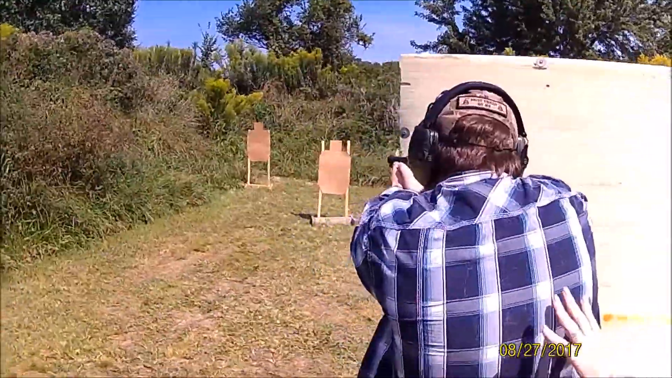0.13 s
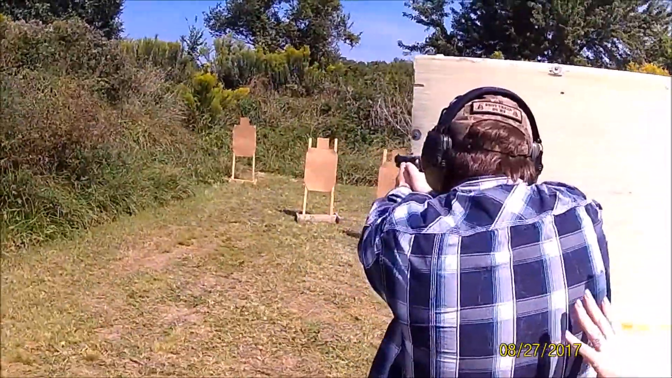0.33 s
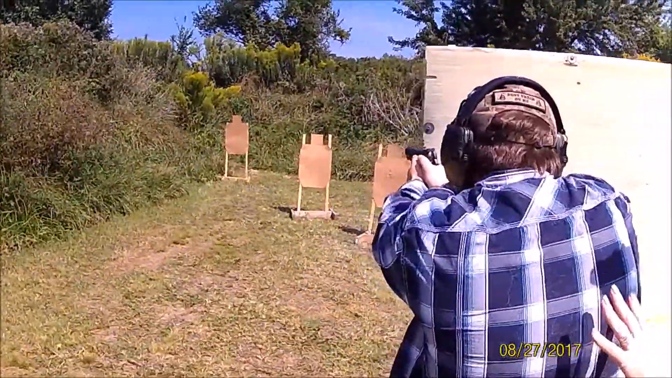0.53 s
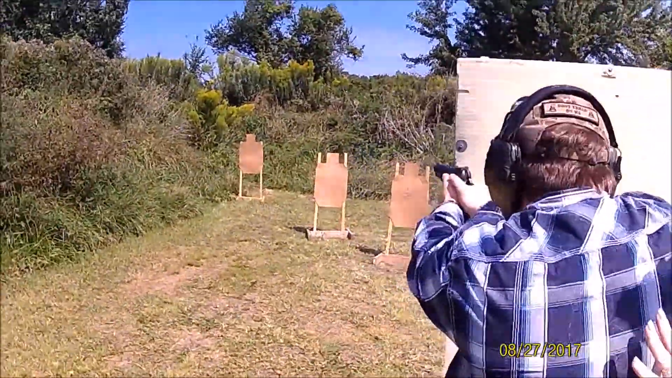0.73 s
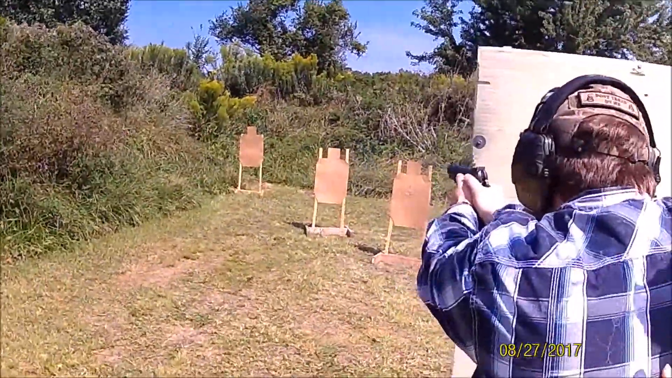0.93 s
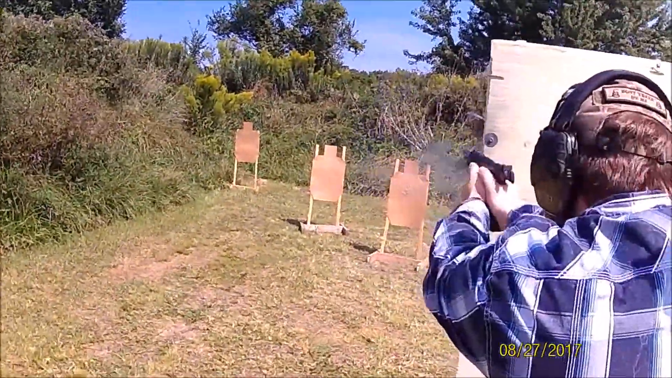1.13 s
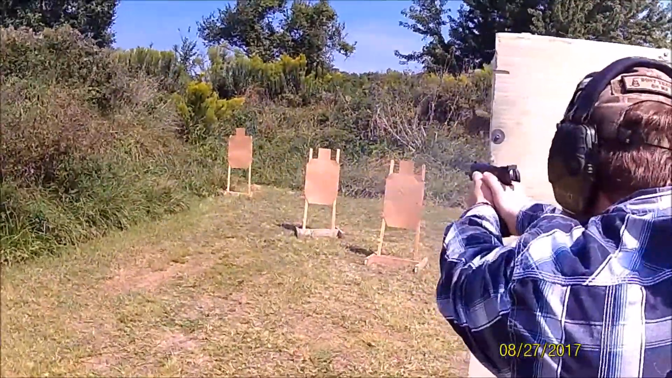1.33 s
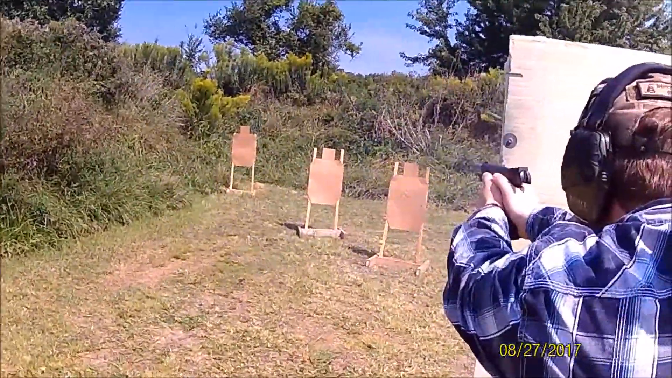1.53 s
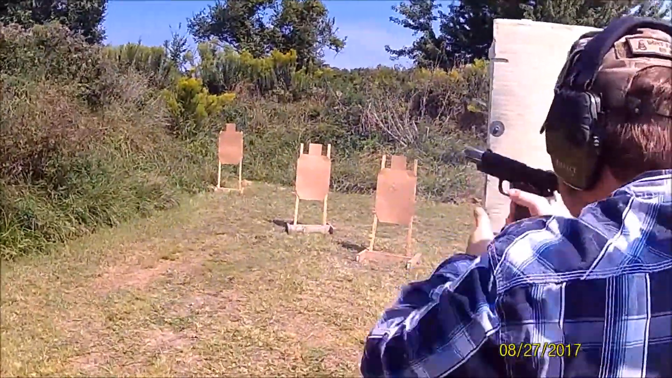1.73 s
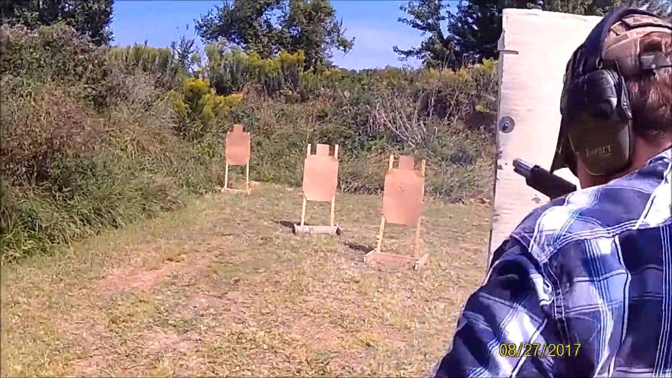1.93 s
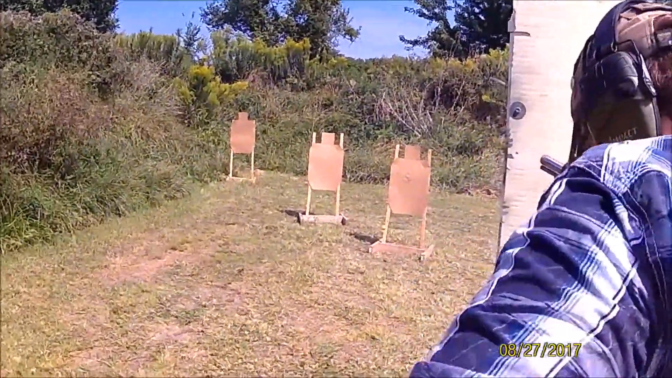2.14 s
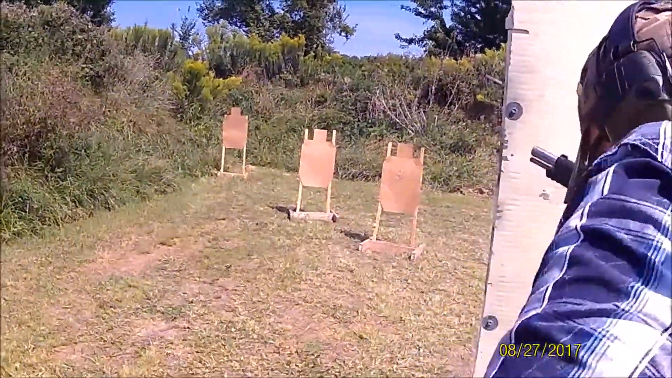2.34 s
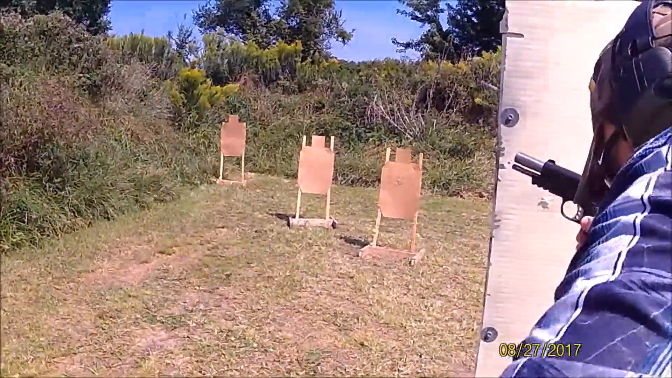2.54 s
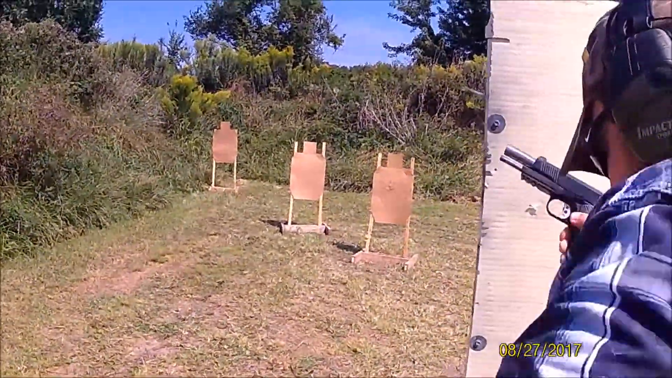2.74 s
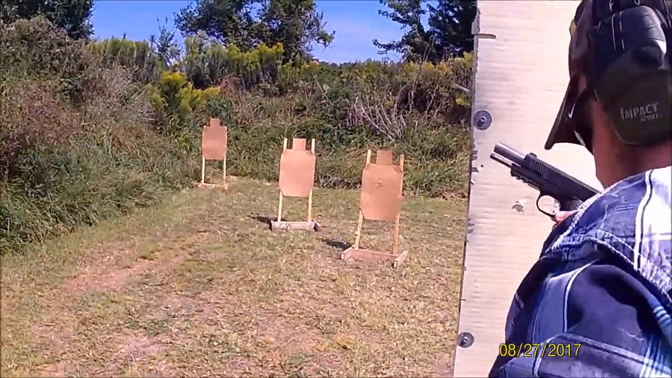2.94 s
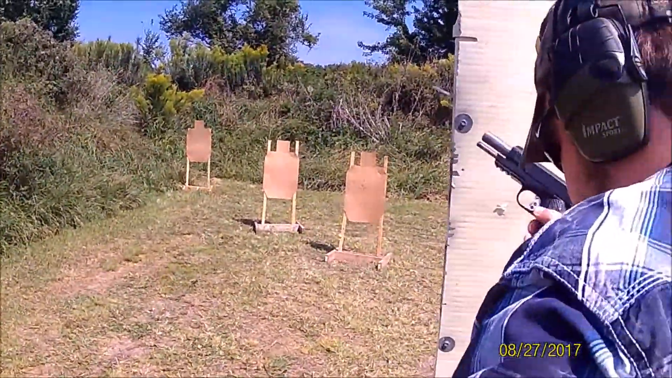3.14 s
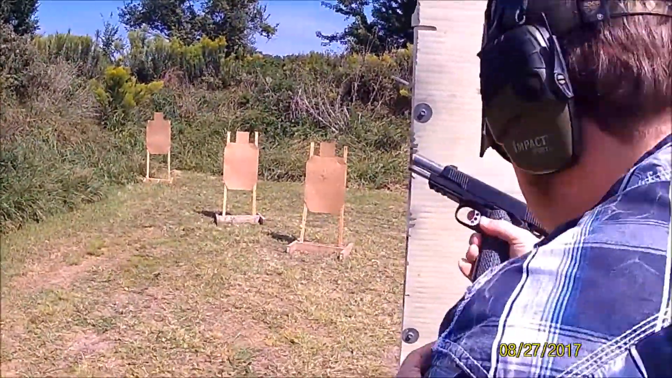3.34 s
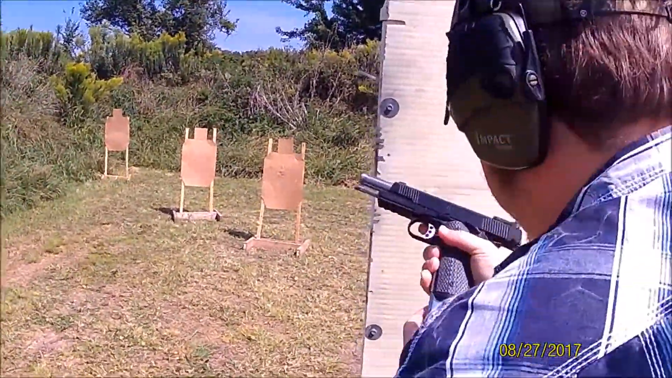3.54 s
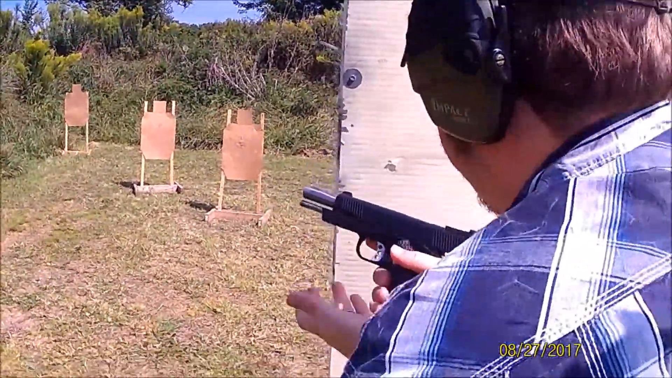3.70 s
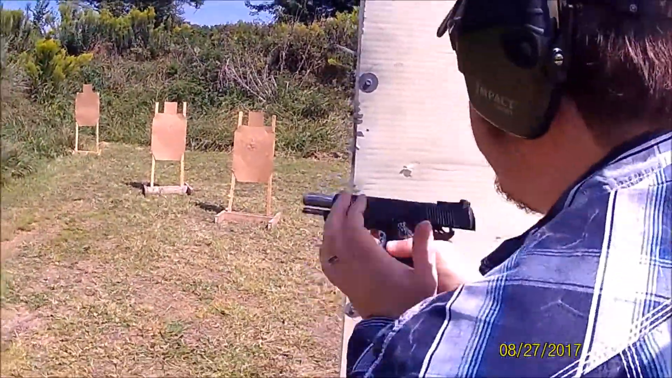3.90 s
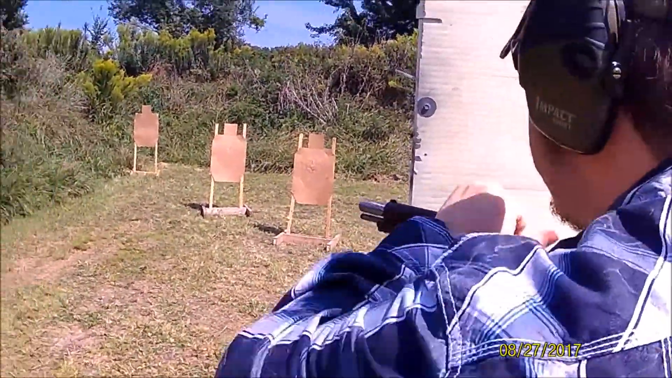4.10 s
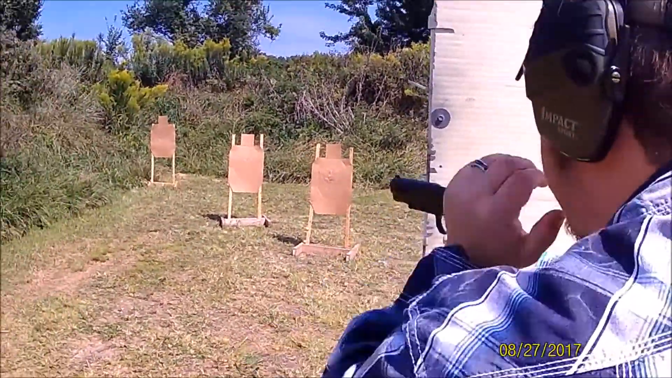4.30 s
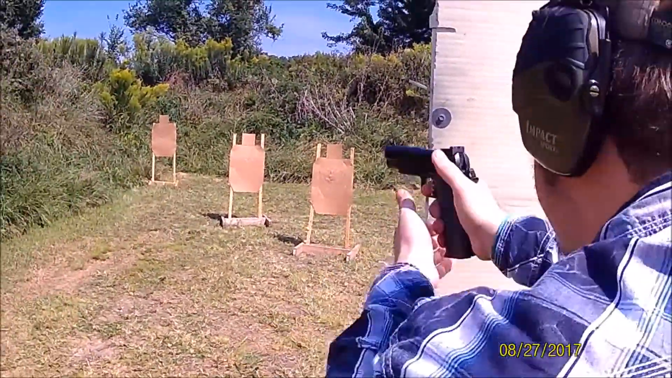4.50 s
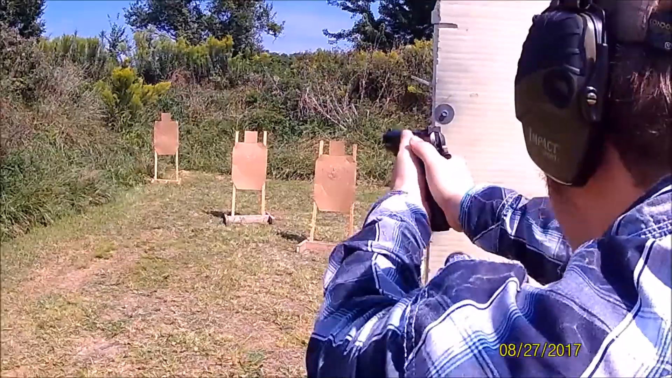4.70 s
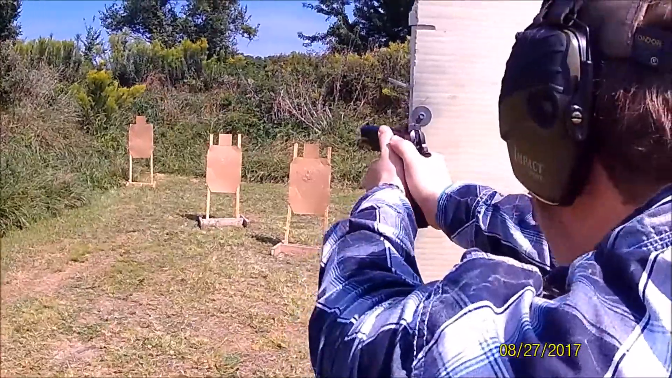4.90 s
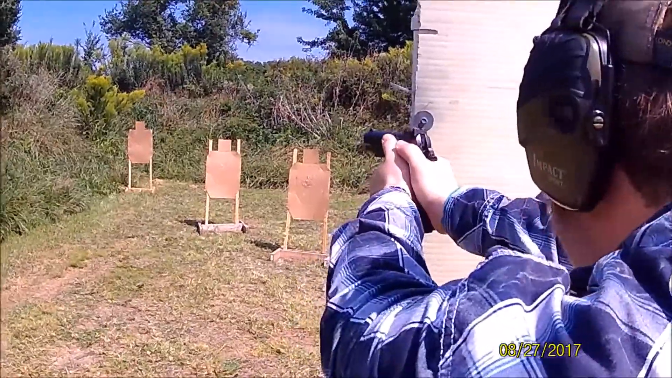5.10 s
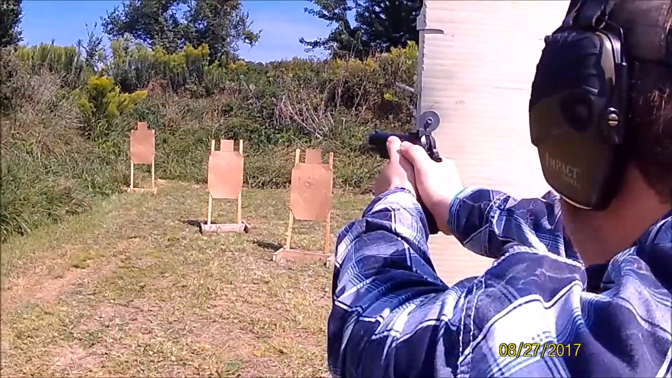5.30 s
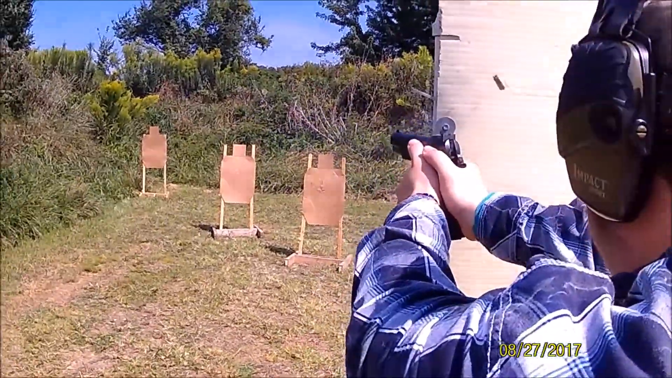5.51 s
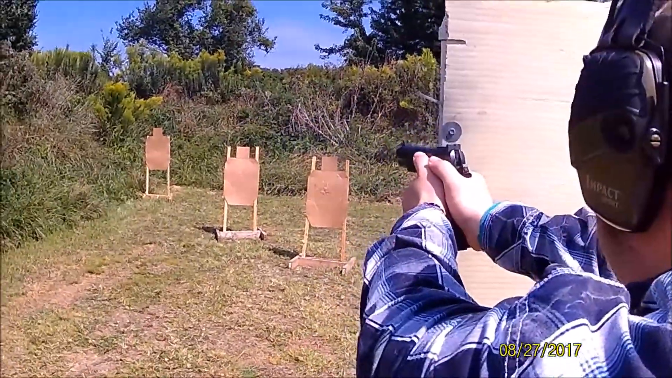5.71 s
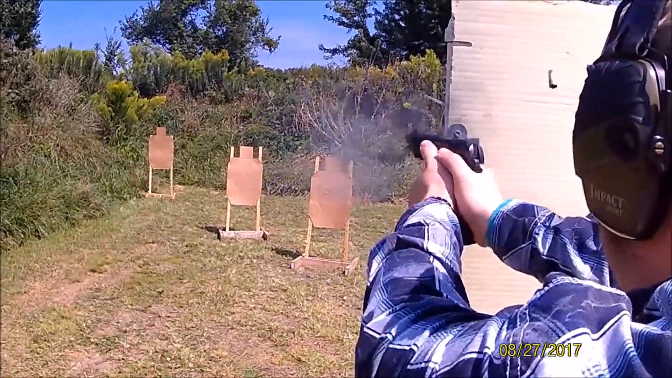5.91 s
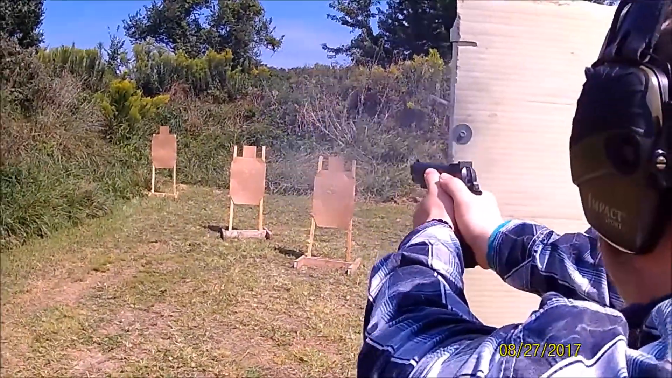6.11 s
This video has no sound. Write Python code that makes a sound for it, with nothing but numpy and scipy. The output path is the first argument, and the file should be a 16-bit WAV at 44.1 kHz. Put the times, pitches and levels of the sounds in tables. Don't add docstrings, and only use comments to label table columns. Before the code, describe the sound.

Close sharp pistol shots crack in two pairs at an outdoor range, with duller neighbouring shots, slapping echoes, microphone knocks and a clicking reload.

```python
import sys
import numpy as np
from scipy import signal
from scipy.fft import rfft, irfft
from scipy.io import wavfile

SR = 44100
rng = np.random.default_rng(int(sys.argv[2]) if len(sys.argv) > 2 else 0)


def generate_wav(sig):
    pcm = np.round(np.clip(np.atleast_2d(sig).T, -1, 1) * 32767).astype(np.int16)
    wavfile.write(sys.argv[1], SR, pcm)


def natural_amplitude(level_db):
    exponent = np.asarray(level_db, float) / 20
    return 10 ** exponent


N = 271201
TIME = np.arange(N) / SR

# (time [s], level [dB], rise of the later blast [dB], first wall [dB], second wall [dB])
NEAR_SHOTS = [
    (0.5866, -2, 1.5, 6, 1.5),
    (1.074, -1.5, -2, 5.5, 13.5),
    (5.3254, -5, 2, 4.5, 6.5),
    (5.832, -4, 7, -15, 10.5),
]
# (time [s], pulse [dB], upper ring [dB], low push [dB], scatter [dB])
FAR_SHOTS = [
    (0.3711, 12, -6, -8, -4.5),
    (1.4024, 10, 4.5, -1.5, 0),
    (2.4247, 10, 2, -6.5, -3),
    (3.4273, 11, -6, -11, -3),
    (3.647, 13.5, -4.5, -12, -3.5),
]
# (pitch [Hz], width [Hz], level [dB])
HOUSING = [(1303.5, 150, 3), (1790, 240, 1.5), (4168, 2000, -16.5), (5840, 2100, -29.5)]
# (pitch [Hz], width [Hz], level [dB])
UPPER_PORTS = [(2900, 350, -6.5), (4250, 600, 14), (4800, 460, -1), (5970, 780, -9), (8200, 2500, -4.5)]
# (pitch [Hz], width [Hz], level [dB])
SHELL = [(770, 110, -5.5), (1250, 740, -3)]


def rms_one(x):
    return x / np.sqrt(np.mean(x ** 2) + 1e-20)


def in_time(rows, start=0):
    s, *columns = np.transpose(rows)
    return [np.interp(TIME - start, s, c, left=-150, right=-150) for c in columns]


def butter(x, hz, kind, order=2):
    return signal.sosfilt(signal.butter(order, hz, kind, fs=SR, output="sos"), x)


def drift(rate):
    return rms_one(butter(rng.standard_normal(N), rate, "low"))


def coloured(spectrum):
    hz, db = np.transpose(spectrum)
    log_hz = np.log(np.fft.rfftfreq(N, 1 / SR) + 1)
    shape = natural_amplitude(np.interp(log_hz, np.log(hz), db, left=-90, right=-90))
    return rms_one(irfft(rfft(rng.standard_normal(N)) * shape, N))


def ring(x, hz, width, db=0):
    r, w = np.exp(-np.pi * width / SR), 2 * np.pi * hz / SR
    return natural_amplitude(db) * signal.lfilter([0, np.sin(w)], [1, -2 * r * np.cos(w), r * r], x + 1e-18)


def body(x, modes):
    return sum(ring(x, *mode) for mode in modes)


def clicks(s, db):
    out = np.zeros(N)
    np.add.at(out, np.round(np.asarray(s) * SR).astype(int), natural_amplitude(db))
    return out


def tent(age, rise, fall):
    return np.where(age < 0, rise * age, -fall * age)


def near_shots():
    # (peak after shot [s], level [dB], rise [dB per s], fall [dB per s], treble [dB])
    returns = [
        (.012, 22, -250, 2002, -9.5),
        (.066, 1, -110, 429.5, -2),
        (.19, -18, 130.5, 163, 2),
    ]
    s, db, rise_db = np.transpose(NEAR_SHOTS)[:3]
    slaps, bundles = walls()
    low, high = leaf_noise()
    blast = body(rng.standard_normal(N), HOUSING[:2] + [(796, 150, -11)])
    blast = rms_one(butter(blast, 420, "high", order=3))
    wide = rms_one(butter(rng.standard_normal(N), [700, 2200], "band"))
    early = sum(np.exp(-np.clip(TIME - t, 0, 9) / 0.044) * (TIME >= t) for t in s).clip(0, 1)
    low_echo = early * blast + (1 - early) * (.7 * low + 0.42 * wide)
    near = scatter(s, db, returns, low_echo, high * (1 + 0.95 * early))
    near *= natural_amplitude(sum(r * (TIME > t + .025) * (TIME < t + .45) for t, r in zip(s, rise_db)))
    gate = np.zeros(N)
    for t, level_db, length in bundles:
        age = TIME - t
        gate += natural_amplitude(level_db) * np.clip(age / .002, 0, 1) / (1 + (age / length) ** 6)
    near += gate * (blast[::-1] + 0.69 * high)
    return near + pulses(*np.transpose(slaps), edge_db=-4.0)


def far_shots():
    # (peak after shot [s], level [dB], rise [dB per s], fall [dB per s], treble [dB])
    returns = [
        (.0005, 1.5, 0.5, 2500.5, 7.5),
        (.01, -20.5, 1, 150, -2),
        (.055, -25, 900, 99.5, 11),
        (.085, -9.5, 347, 298.5, 6),
        (.12, -28, 403, 67.5, -4),
    ]
    s, db, upper_db, push_db, scatter_db = np.transpose(FAR_SHOTS)
    low, high = leaf_noise()
    direct = butter(pulses(s, db, upper_db, push_db, edge_db=-38), 3000, "low", order=1)
    return direct + scatter(s, scatter_db, returns, low, high)


def pulses(s, db, upper_db, push_db, edge_db):
    ground_s, ground_db = .0023, -9.5
    first = clicks(s, db) + clicks(s + ground_s, db + ground_db)
    rings = ring(first, *HOUSING[0]) + ring(clicks(s, db + upper_db), *HOUSING[1])
    rings += body(first, HOUSING[2:])
    push = ring(clicks(s - .0004, db + push_db), 530, 300)
    edge = butter(first, 6500, "high") * natural_amplitude(edge_db)
    return butter(rings + push, 5400, "low", order=1) + edge


def walls():
    # (time [s], pulse [dB], bundle [dB])
    strays = [
        (.667, 4, -5),
        (.688, -12, -26),
        (1.148, -11.5, -4.5),
        (5.345, 14.5, -2.5),
        (5.406, -3.5, -19),
        (5.906, -2.5, -3.5),
    ]
    # (first [s], second [s])
    wall_s = (.043, .064)
    wall_upper_db, wall_push_db = (3.5, -7.5), (-6, -11)
    stray_upper_db, stray_push_db = 2, -10
    brush_s, brush_db, brush_length_s = .023, 13, .015
    smear_lead_s, smear_db, smear_length_s = 0.0017, (7.5, 0.5), (.01, .006)
    slaps, bundles = [], []
    for s, _, _, *both in NEAR_SHOTS:
        bundles.append((s + brush_s, brush_db, brush_length_s))
        for k, db in enumerate(both):
            slap_s = s + wall_s[k]
            slaps.append((slap_s, db, wall_upper_db[k], wall_push_db[k]))
            bundles.append((slap_s - smear_lead_s, db + smear_db[k], smear_length_s[k]))
    for s, db, bundle_db in strays:
        slaps.append((s, db, stray_upper_db, stray_push_db))
        bundles.append((s - smear_lead_s, bundle_db, smear_length_s[1]))
    return slaps, bundles


def leaf_noise():
    # (pitch [Hz], level [dB per Hz])
    leaf_colour = [(88, -66.5), (150, -33.5), (243, -37.5), (495, -10), (567, -12.5), (742, -5.5),
                   (850, -12.5), (1070, -7), (1320, 3.5), (2450, -20.5), (3670, -31), (4210, -32.5),
                   (6180, -21.5), (6680, -29), (15000, -55.5)]
    # (from [Hz], to [Hz])
    port_gap = [3200, 3750]
    leaves = coloured(leaf_colour)
    low, high = butter(leaves, 2500, "low", order=4), butter(leaves, 2500, "high", order=4)
    high = 0.36 * high + np.std(high) * rms_one(body(high, UPPER_PORTS))
    high = high - .7 * butter(high, port_gap, "band", order=1)
    second_port = rms_one(butter(np.roll(leaves, SR), [1650, 2150], "band"))
    low = butter(low + 0.55 * np.std(low) * second_port, 2350, "low", order=6)
    return low, high


def scatter(starts, levels_db, returns, low, high):
    low_power, high_power = np.zeros((2, N))
    for start, level_db in zip(starts, levels_db):
        i = int(start * SR)
        age = TIME[i:i + SR] - start
        for peak, db, rise, fall, treble_db in returns:
            power = natural_amplitude(2 * (db + level_db + tent(age - peak, rise, fall)))
            low_power[i:i + SR] += power
            high_power[i:i + SR] += power * natural_amplitude(2 * treble_db)
    low_grain = natural_amplitude(1.5 * drift(63).clip(-2, 2))
    high_grain = natural_amplitude(1.5 * drift(120).clip(-2, 2))
    return np.sqrt(low_power) * low * low_grain + np.sqrt(high_power) * high * high_grain


def bank_slaps():
    # (delay [s], pulse [dB])
    far_banks = [(.022, -20), (.036, -21), (.088, -15), (.12, -19)]
    near_bank_s, near_bank_db = .19, -15
    upper_db, push_db = -16, -15
    rows = [(s + delay, db + scatter_db) for s, *_, scatter_db in FAR_SHOTS for delay, db in far_banks]
    rows += [(s + near_bank_s, near_bank_db) for s, *_ in NEAR_SHOTS]
    s, db = np.transpose(rows)
    return butter(pulses(s, db, db * 0 + upper_db, db * 0 + push_db, edge_db=-40.5), 5000, "low")


def pings():
    # (time [s], pitch [Hz], level [dB], time to fall by 60 dB [s])
    tones = [
        (.46, 1760, -21, .9),
        (2.33, 1880, -46, .3),
        (2.54, 1765, -37, 1.6),
        (2.672, 1870, -31, .15),
        (3.84, 2050, -26, .12),
        (2.49, 9000, -59, .8),
        (2.52, 8100, -57, .6),
        (.42, 8200, -54, .7),
    ]
    out = np.zeros(N)
    for s, hz, db, t60 in tones:
        age = np.clip(TIME - s, 0, None)
        out += natural_amplitude(db - 60 * age / t60) * (1 - np.exp(-age / .008)) * np.sin(2 * np.pi * hz * age)
    return out


def knocks():
    # (time [s], push [dB], shell ring [dB])
    soft = [(0.842, -6.5, -21), (.911, -24, -2.5), (.96, -20.5, -8.5), (0.969, -16.5, -32),
            (1.01, -22.5, -10), (1.062, -22, -20), (1.182, -36, -8), (1.208, -39, -11), (1.23, -39, -3),
            (1.24, -48, 1), (1.269, -21, -8), (1.305, -12.5, -13.5), (1.348, -30, -15.5),
            (1.3782, -12.5, -5), (1.397, -10, -18), (1.4104, -3.5, 6), (1.4329, -8, -12.5), (1.483, -4, -9),
            (3.611, -25, -24), (4.0011, -16.5, -7), (4.031, -39.5, -18), (4.038, -41.5, -20.5),
            (4.055, -13, -15), (4.0925, -2.5, -0.5), (4.1615, -5, -15)]
    # (time [s], shell ring [dB], tick [dB])
    taps = [
        (.0046, -5.5, -19),
        (.04, -2.5, -14.5),
        (0.0829, -1.5, -11.5),
        (0.8448, -5, -27),
        (4.095, -8.5, -49),
        (4.114, -28, -38),
        (4.1637, -14.5, -56),
        (4.057, -19.5, -47.5),
    ]
    # (pitch [Hz], width [Hz], level [dB])
    tapped_shell = [(792, 82, -5.5), (764, 20, -30.5), (1240, 550, 3.5), (1330, 39, -20), (1970, 140, -9)]
    # (pitch [Hz], width [Hz], level [dB])
    tick_modes = [(3180, 350, -6), (3480, 570, 3), (4150, 350, 1), (6020, 520, -1)]
    s, push_db, shell_db = np.transpose(soft)
    lag = np.arange(-160, 400) / SR
    thump = np.exp(-(lag / .0008) ** 2)
    thump -= .6 * np.exp(-((lag + .0015) / .0009) ** 2)
    thump -= .12 * np.exp(-((lag - .0035) / .002) ** 2)
    heard = butter(np.convolve(clicks(s, push_db), thump)[110:N + 110], 81, "high")
    heard += butter(body(clicks(s + 0.00066, shell_db), SHELL), 2200, "low", order=4)
    s, shell_db, tick_db = np.transpose(taps)
    shell = body(clicks(s, shell_db) - clicks(s - .0005, shell_db - 12.5), tapped_shell)
    ticks = body(clicks(s + 0.00067, tick_db), tick_modes)
    heard += butter(shell, [560, 4300], "band", order=3)
    heard += butter(ticks, [2600, 6500], "band", order=3)
    return heard / natural_amplitude(gain_db())


def clacks():
    # (time [s], pulse [dB], upper ring [dB], low push [dB])
    events = [
        (.5562, 2.5, 7, -20),
        (0.576, 4.5, 1, -14),
        (0.582, -11, 12, -4),
        (0.696, -6.5, 10.5, 1),
        (0.7232, -6.5, 10.5, 4),
        (.748, -8, 5.5, 7),
        (5.16, -31.5, -5.5, -18.5),
    ]
    s, db, upper_db, push_db = np.transpose(events)
    rattle = rng.standard_normal(130) * np.exp(-np.arange(130) / 22) * 0.16
    contact = pulses(s, db, upper_db, push_db, edge_db=-16.5) + ring(clicks(s, db), 3200, 900, db=6.5)
    return butter(np.convolve(contact, rattle)[:N], 5500, "low", order=4)


def rubbing():
    # (time [s], length [s], rumble [dB], change over the stroke [dB])
    strokes = [
        (0.849, .085, -9, -11),
        (0.952, .07, -21, 3.5),
        (1.05, .012, -25.5, -1),
    ]
    rise, fall = 1500, 1198
    levels = []
    for s, length, db, sag_db in strokes:
        age = TIME - s
        level = db + sag_db * (age / length).clip(0, 1)
        levels.append(level + rise * age.clip(-1, 0) - fall * (age - length).clip(0, 1))
    rumble_db = np.max(levels, axis=0)
    hiss_db = rumble_db - 23
    jerks = (rng.random(N) < 1500 / SR) * natural_amplitude(4 * rng.exponential(1, N).clip(0, 4))
    jerks = jerks * rng.choice([-1, 1], N)
    rumble = rms_one(butter(jerks, [40, 420], "band"))
    rumble += .5 * rms_one(butter(body(jerks, SHELL), 2200, "low"))
    hiss = rms_one(body(rng.standard_normal(N), UPPER_PORTS))
    return natural_amplitude(rumble_db) * rms_one(rumble) + natural_amplitude(hiss_db + 1.7 * drift(53)) * hiss


def reload():
    # (time [s], level [dB], length [s], bright edge [dB])
    contacts = [
        (3.321, -24.5, 0.013, -26.5),
        (3.346, -33, 0.029, -20),
        (4.113, -38, 0.023, -13),
        (4.237, -30, 0.015, -8),
        (4.244, -30.5, 0.046, 3.5),
        (4.262, -23, 0.017, 3.5),
        (4.266, -29, 0.019, 4.5),
    ]
    # (pitch [Hz], width [Hz], level [dB])
    steel = [(1530, 240, -16.5), (2058, 260, 4), (3017, 370, -3.5), (4140, 1900, 4), (5200, 870, -13),
             (9460, 2300, -12.5), (14000, 3000, -18.5)]
    chatter = rms_one((rng.random(N) < 5000 / SR) * rng.standard_normal(N))
    dull, edge = np.zeros((2, N))
    for s, db, length, edge_db in contacts:
        swell = natural_amplitude(db - 26 * np.clip(TIME - s, 0, 1) / length) * (TIME >= s)
        dull += swell
        edge += swell * natural_amplitude(edge_db)
    dull = butter(body(dull * chatter, steel[:5]), [900, 6500], "band", order=3)
    bright = butter(body(edge * chatter, steel[5:]), 7500, "high")
    return (dull + bright) * natural_amplitude(-13.5)


def background():
    # (pitch [Hz], level [dB per Hz])
    air_colour = [(150, -30.5), (250, -5), (261, -5), (330, -10.5), (773, -7), (967, -9.5), (1370, -5.5),
                  (1890, -1.5), (2330, -17), (4300, -23), (7000, -35.5), (9100, -57.5), (15400, -120)]
    # (pitch [Hz], level [dB per Hz])
    wind_colour = [(8.8, -18), (15, -4.5), (33, 0), (114, -10.5), (226, -18), (258, -23.5), (500, -25),
                   (650, -46), (1100, -120)]
    # (time [s], level [dB])
    gusts = [(0, -21), (.1, -39), (1.3, -34.5), (1.55, -33.5), (1.75, -39.5), (3.0, -42.5), (4.0, -38),
             (4.7, -42), (6.15, -40)]
    # (time [s], depth [dB])
    dropouts = [(1.75, -7), (2.058, -30.5), (2.283, -5), (2.712, -8.5), (2.752, -8), (2.9, -3.5),
                (3.197, -13), (3.898, -8), (4.645, -11), (4.86, -5.5), (5.625, -17), (5.72, -10)]
    # (place [steps], level [dB])
    whine_lines = [(-3, -18), (-2, -11), (-1, -8), (0, 0), (1, -2), (2, -11)]
    whine_hz, whine_step_hz, whine_db, hiss_db = 13301, 82.2, -64, -59.5
    wind_db, = in_time(gusts)
    air = roll() * natural_amplitude(drift(23)) * coloured(air_colour)
    wind = natural_amplitude(wind_db + 3.1 * drift(7.7)) * coloured(wind_colour)
    whine = np.zeros(N)
    for k, db in whine_lines:
        hz = whine_hz + k * whine_step_hz
        whine += natural_amplitude(whine_db + db) * np.sin(2 * np.pi * hz * TIME + k * k)
    holes_db = sum(db * np.exp(-((TIME - s) / 0.012) ** 2) for s, db in dropouts)
    hiss = natural_amplitude(hiss_db + holes_db) * rms_one(butter(rng.standard_normal(N), 2700, "high"))
    return air + wind + whine + hiss


def roll():
    air_db, rise_s, fall = -53.5, 0.17, 8
    power = natural_amplitude(2 * air_db)
    for s, *_ in NEAR_SHOTS + FAR_SHOTS:
        age = (TIME - s).clip(0)
        power = power + natural_amplitude(2 * (-44 - fall * age)) * (1 - np.exp(-age / rise_s))
    return np.sqrt(power)


def gain_db():
    # (time [s], first level [dB], held level [dB], length [s])
    ducks = [
        (0.114, -10, -4.5, 0.13),
        (.38, -7.5, -5, 0.23),
        (.609, -20.5, -6, .205),
        (1.089, -18, -8.5, .08),
        (1.41, -1.5, -12.5, .23),
        (5.348, -19.5, -3, .2),
        (5.8497, -17, -10, 0.23),
    ]
    rest_db, creep_s, step_s = -3, 0.1, .02
    out = np.full(N, rest_db, float)
    for s, first_db, held_db, length in ducks:
        age = TIME - s
        hold = np.clip(age / .001, 0, 1) * np.clip((length - age) / step_s + .5, 0, 1)
        out += hold * (held_db + (first_db - held_db) * np.exp(-age.clip(0) / creep_s))
    return out


def scene():
    shots = near_shots() + far_shots() + bank_slaps()
    handling = knocks() + clacks() + rubbing() + reload()
    return (shots + pings() + handling + background())[None]


def low_pass(x):
    return signal.sosfilt(signal.butter(12, 15850, fs=SR, output="sos"), x)


def record(dry):
    top = natural_amplitude(12)
    ducked = np.clip(dry, -top, top) * natural_amplitude(gain_db())
    return low_pass(np.clip(ducked, -1, 1))


dry = scene()
out = record(dry)
generate_wav(out)
```